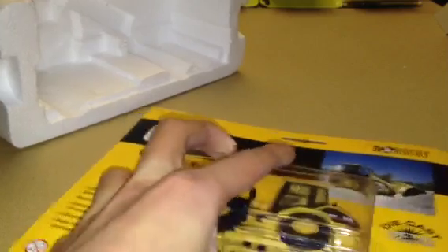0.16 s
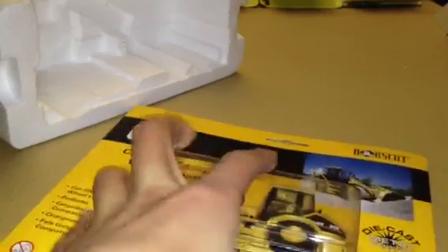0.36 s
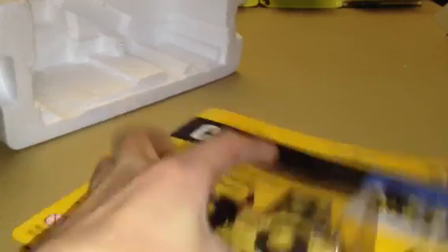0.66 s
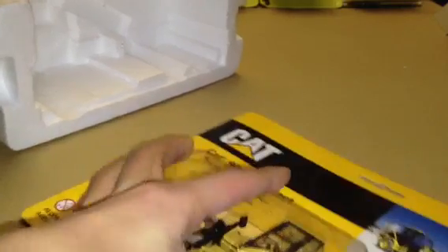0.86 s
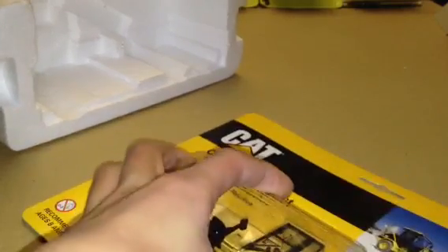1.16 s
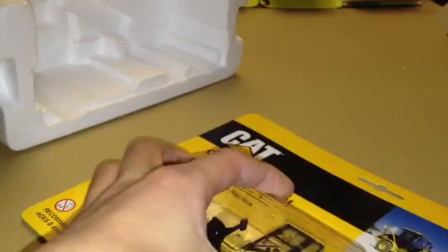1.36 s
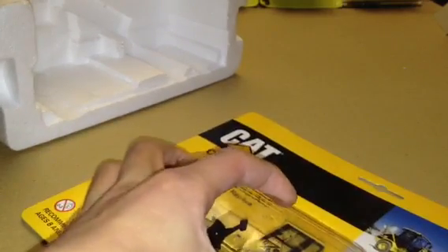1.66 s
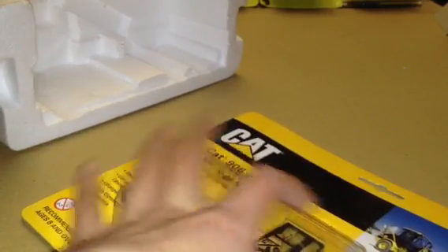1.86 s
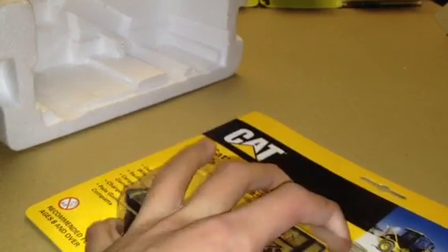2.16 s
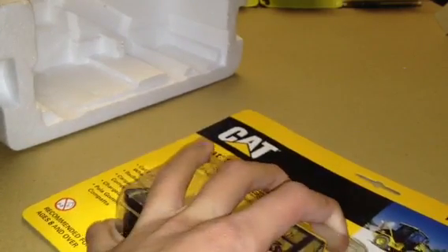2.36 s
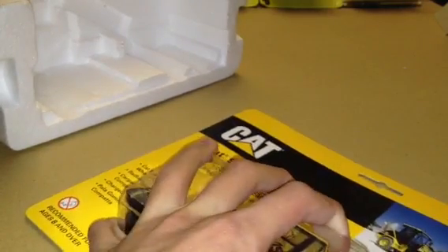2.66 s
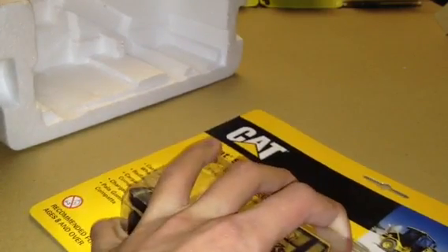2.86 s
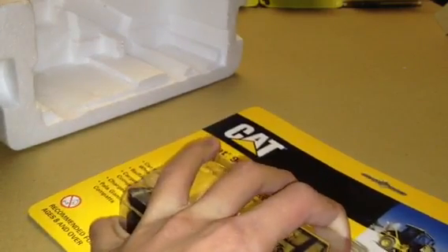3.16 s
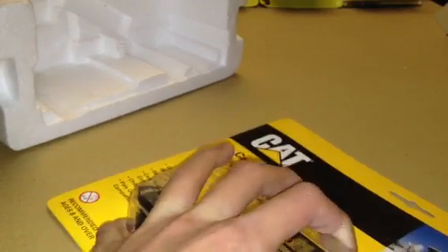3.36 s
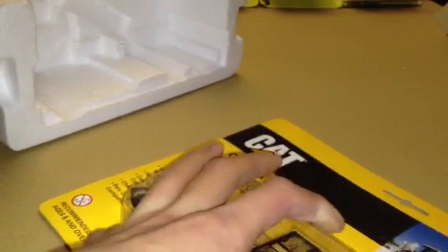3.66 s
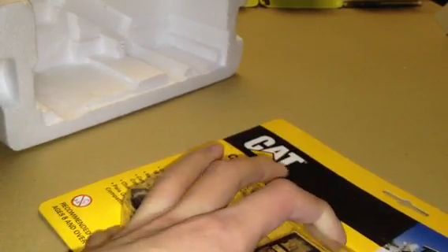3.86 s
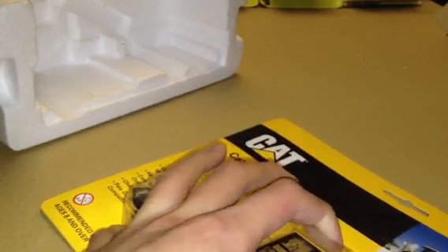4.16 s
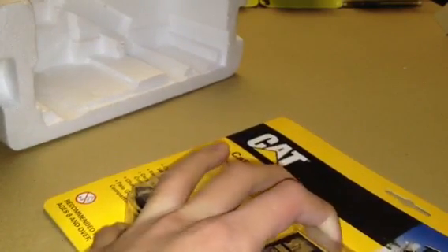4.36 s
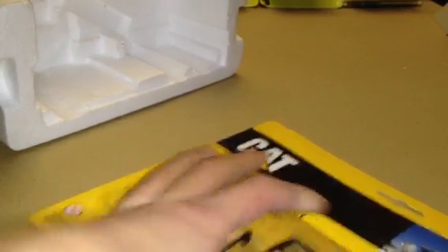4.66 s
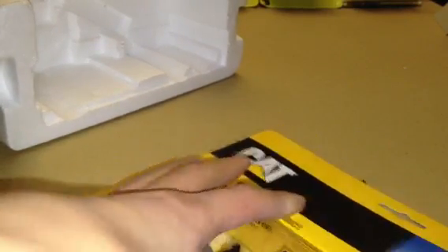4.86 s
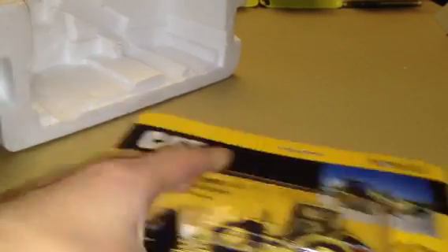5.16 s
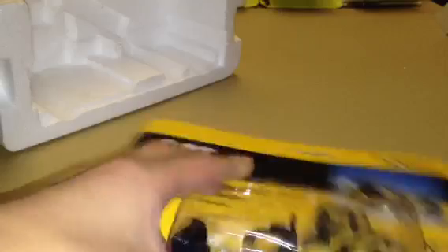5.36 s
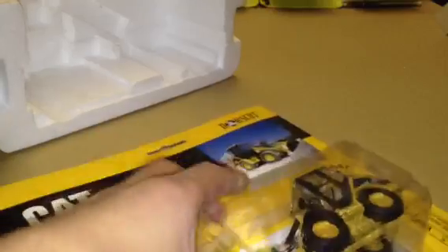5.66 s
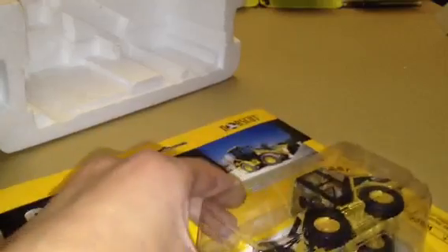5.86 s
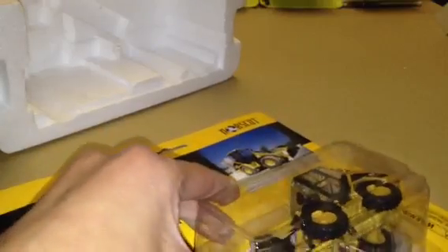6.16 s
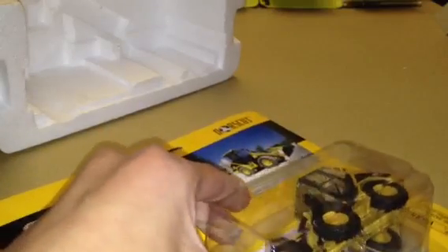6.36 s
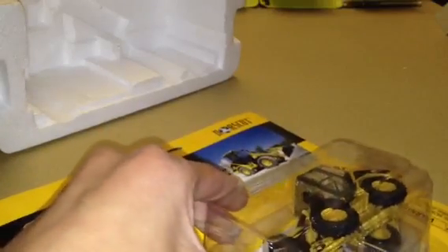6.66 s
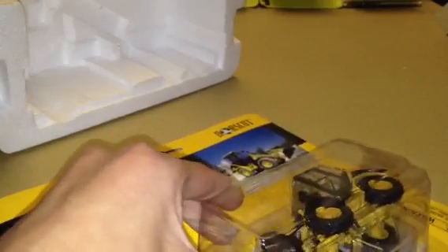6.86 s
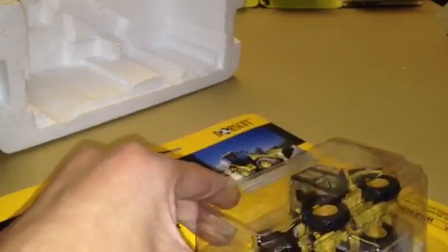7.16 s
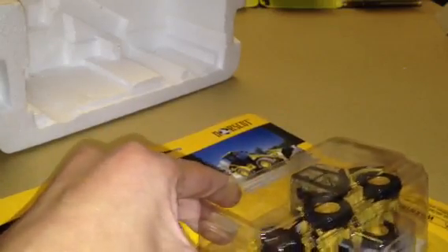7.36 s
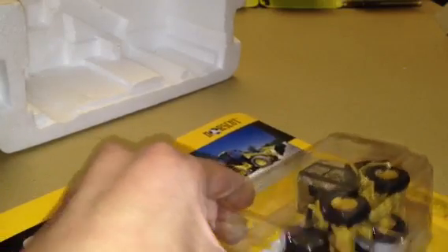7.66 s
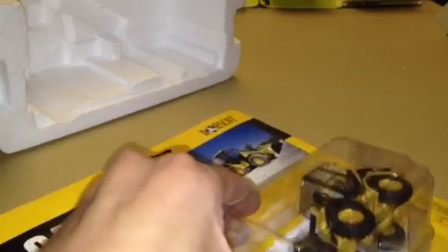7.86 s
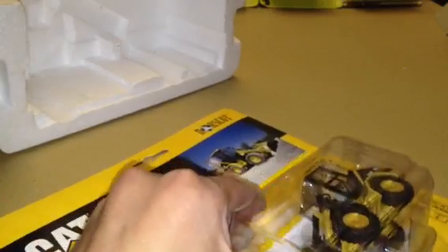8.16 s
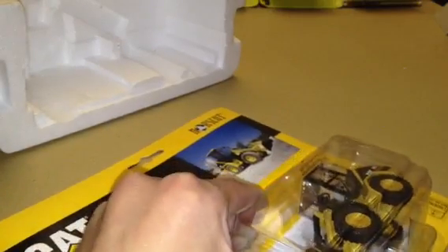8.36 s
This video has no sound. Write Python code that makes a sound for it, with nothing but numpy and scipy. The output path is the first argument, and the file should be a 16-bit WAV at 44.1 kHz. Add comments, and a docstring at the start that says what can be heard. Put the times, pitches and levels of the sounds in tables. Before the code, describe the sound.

Close recording of plastic packaging being pushed and flexed on a table indoors. Uneven strokes of friction hiss, brittle crackles, tearing ticks and faint low card groans fill the first half. A dull thud and smooth scraping mark a shift of the pack midway, followed by a cluster of pops. Later it is sparser and quieter, with small taps, a late sharp crack, a short room tail and faint hiss.

```python
"""Blister pack worked off its card

Hands work a stiff plastic blister off its cardboard backing on a table, close to the microphone in a small room.
The thin shell buckles in sharp snaps, noise bursts through shell resonances, that knock the card lower and longer.
Glue and fibres rasp in streams of ticks and part with high pings; fingers and card slide as patchy friction noise,
with crinkles, weaker snaps and taps, dull table bumps, low gliding groans and narrow singing bands.
The room adds early echoes and a short diffuse tail over a faint steady hiss.
"""
import sys
import numpy as np
from scipy import signal
from scipy.fft import rfft, irfft, next_fast_len
from scipy.io import wavfile
from scipy.ndimage import uniform_filter1d, map_coordinates

SR = 44100
rng = np.random.default_rng(int(sys.argv[2]) if len(sys.argv) > 2 else 0)


def persist_wave(psi):
    """Save psi, clipped to +-1, as 16-bit WAV."""
    counts = np.round(np.clip(psi, -1, 1) * 32767).astype(np.int16)
    wavfile.write(sys.argv[1], SR, np.atleast_2d(counts).T)


N = 374850

# Levels in the event tables are before the trims set in the function that plays them.
# The hand pushes the pack along. Each row: start in seconds, fastest moment in seconds, end in seconds,
# friction hiss in dB, card body in dB re the hiss.
STROKES = [(0, 0.196, 0.25, -49, -1), (0.264, 0.31, 0.37, -50.5, -4.5), (0.451, 0.49, 0.78, -52.5, -4),
           (0.575, 0.623, 0.8, -46.5, -2.5), (0.767, 0.85, 1.01, -57, -4), (1.155, 1.203, 1.36, -51, -3.5),
           (1.78, 1.88, 1.93, -50, -0.5), (1.939, 1.962, 2.11, -58, 0.5), (2.324, 2.36, 2.56, -56.5, -1),
           (2.55, 2.568, 2.65, -50.5, -3), (2.667, 2.782, 2.87, -46.5, -6.5),
           (3.117, 3.284, 3.39, -49.5, 0), (3.509, 3.553, 3.59, -50.5, -6.5), (3.69, 3.733, 3.74, -59, -9),
           (4.016, 4.08, 4.1, -49, -6), (4.15, 4.267, 4.5, -60.5, 1), (4.299, 4.35, 4.39, -44, -12),
           (4.46, 4.48, 4.6, -58, -12), (4.601, 4.703, 4.93, -50, -3.5), (4.89, 4.939, 5.2, -46, -1),
           (4.96, 5.08, 5.28, -46.5, -4.5), (5.196, 5.257, 5.68, -50, -1), (5.47, 5.51, 5.7, -46.5, -4.5),
           (5.758, 5.825, 6.2, -57.5, 0.5), (6.007, 6.24, 6.55, -59.5, -8),
           (6.392, 6.522, 6.65, -56.5, -2.5), (6.674, 6.818, 6.9, -76.5, 6), (7.349, 7.388, 7.7, -60.5, -2),
           (7.422, 7.486, 7.55, -51.5, 4), (7.593, 7.654, 7.76, -55, -5.5), (7.87, 7.904, 7.94, -57, 6.5),
           (7.96, 8.014, 8.9, -61.5, -6), (8.13, 8.312, 8.46, -52.5, 3), (8.4, 8.503, 8.6, -55, 5.5)]
# The pack glides flat on the table with less crinkling. Each row: start in seconds, end in seconds.
GLIDES = [(4.68, 5.2), (5.42, 5.64)]
# Quieter spans: no grip hiss and no random taps, but listed events still sound.
# Each row: start in seconds, end in seconds.
QUIETER_SPANS = [(2.17, 2.32), (3.02, 3.1), (3.76, 3.9), (6.61, 7.35), (7.79, 7.87)]
# Short tears and scrapes. Each row: start in seconds, swell point in seconds, nominal end in seconds,
# level in dB, treble in dB re the middle, squeak in Hz, tick share 0-1 (capped when played).
# The points may be out of order, and short rows play 512 samples.
RASPS = [(.04, 0.172, 0.22, -52.5, -1, 2600, 0.76), (0.454, 0.494, 0.56, -48.5, 5, 1390, 0),
         (0.681, .695, 0.72, -51, -4, 3300, .7), (.926, 0.94, 0.97, -38, -3, 7340, 0.6),
         (0.993, 0.991, 1.03, -33.5, -6.5, 2030, 0.5), (1.193, 1.225, 1.28, -37.5, -9, 1730, 0.53),
         (1.232, 1.27, 1.299, -37.5, 0, 3160, 0.74), (2.431, 2.435, 2.47, -40, -9, 3420, 0.46),
         (2.726, 2.736, 2.85, -46.5, 7, 3860, 0.5), (3.228, 3.248, 3.27, -40, -11, 1620, 0.7),
         (4.035, 4.072, 4.05, -45, -4, 4840, 0.8), (4.308, 4.324, 4.31, -39, -3, 1450, .55),
         (5.228, 5.289, 5.305, -32.5, -6, 5170, 0.76), (5.492, 5.501, 5.51, -41, 8, 5100, 0.2),
         (6.955, 6.966, 7.01, -47.5, -12.5, 1510, 0.38), (7.15, 7.159, 7.1, -44, 0, 1100, 0.25),
         (7.462, 7.49, 7.51, -42, -2.5, 1010, 0.56), (7.876, 7.883, 7.89, -43, 1, 4700, 1)]
# Threads of glue part with a tiny high ping. Each row: start in seconds, level in dB over 10 ms, centre in Hz.
PINGS = [(.172, -46, 11000), (1.948, -50, 8850), (2.593, -41, 10000), (2.799, -42, 10000),
         (3.364, -53, 7000), (3.942, -44, 7500), (3.961, -46.5, 8260), (3.996, -52, 8800),
         (4.017, -50, 8850), (4.451, -43, 6000)]
# The shell buckles. Each row: start in seconds, crack in dB over 10 ms, card knock in dB re the crack,
# treble in dB re the crack, card resonance in Hz, panel resonance in Hz, panel ring in dB re the whole shell,
# slip length in ms before scaling.
SNAPS = [(0.2184, -49.5, 6.5, 0.5, 931, 1580, 0, 3.6), (0.2708, -46, 5.5, -4.5, 282, 1670, -7, 5),
         (0.37, -47.5, 6.5, -8, 640, 3280, -2, 4), (0.6142, -31, 1, -6, 920, 2100, -1, 4.3),
         (.983, -39, 2.5, -8, 710, 3070, 10, 2.4), (.99, -31, .5, -9, 710, 2120, 0.5, 2.5),
         (1.1758, -39.5, -9, -2.5, 685, 1820, -2, 2.2), (1.2112, -40.5, 1, 7, 940, 2500, 5, 1.4),
         (1.4881, -37.5, -3.5, -2, 700, 1470, -1, 2.9), (1.5984, -35, 1, -10.5, 536, 3230, -8, 1.7),
         (1.8023, -42.5, 4.5, -6.5, 630, 1620, 1, 1.3), (1.9692, -40.5, -1, -4, 690, 1460, -0.5, 6),
         (2.0634, -43.5, 3.5, 3.5, 620, 1420, -9, 3.3), (2.5586, -36.5, 3.5, -15.5, 485, 3100, 0.5, 1.9),
         (2.5814, -43, 0.5, 8.5, 1050, 2840, -9, 1.6), (2.779, -38, 2.5, -3, 497, 1670, -4, 6.1),
         (2.8199, -44.5, 0, 5, 890, 4720, 0, 0.48), (2.8771, -37.5, -5.5, 4.5, 890, 4900, -1, 0.94),
         (2.963, -20, -14, -9, 500, 3290, -7, .9), (3.1478, -29, -7.5, -3, 470, 1560, -2, 0.91),
         (3.2215, -45, 6, -17.5, 684, 1990, 1, 1.8), (3.242, -22.5, -10.5, 5, 1090, 1650, 1.5, 2.16),
         (3.2608, -35, -8.5, -13, 590, 1833, -3, 3.5), (3.3002, -45.5, 9, -16, 510, 3810, -5, 2.6),
         (3.902, -49, -12.5, -15, 536, 2540, 8, 1.1), (4.0714, -41.5, -3.5, -2.5, 545, 4770, -13, 4.9),
         (4.325, -40, -3, -7, 620, 2730, -1, 4), (4.3578, -39, -14, -3.5, 500, 4620, -2, 5.4),
         (4.4511, -41, -14, -5, 550, 4760, -3, 5.2), (4.9106, -36.5, -0.5, 4, 940, 1770, -3, 1.25),
         (5.073, -34.5, 2, -0.5, 258, 1390, -2, 4.1), (5.235, -33, -3, 3.5, 904.8, 4440, 3, 3.03),
         (5.249, -36, 1.5, -12, 690, 3130, -2, 1.7), (5.2664, -26.5, -6, 0, 634, 2840, -7, 1.2),
         (5.365, -46, 7, -8, 613, 1440, -9, 2.3), (5.397, -31, -6, -7, 910, 4470, -4, 1.2),
         (5.657, -44, -24, 5, 480.5, 4180, 8, 2.16), (5.6789, -43, -19, 1.5, 880, 4710, 5, 1.8),
         (5.7114, -39, -20, 1, 460, 3467, 1, 1.5), (5.7937, -40, 3.5, 8.5, 940, 4550, -3, 2.1),
         (6.191, -42, .5, 1.5, 479, 4640, -1, 1.9), (6.3531, -31.5, -7, 1.5, 1240, 4500, -3, 3.6),
         (6.3935, -43, 8, -4, 819, 1400, -13, 2.3), (6.956, -46, 0.5, 1.5, 750, 2640, -11.5, 3.5),
         (7.1916, -45.5, 2, 2, 710, 4790, 1, 4.7), (7.2518, -44, 6.5, -1.5, 1060, 1210, -5, 2.8),
         (7.605, -46.5, 2.5, -0.5, 980, 2700, -4, 1), (7.6915, -51, 9, 8, 923, 4700, 2, 1.1),
         (7.8663, -24.5, -7.5, 0.5, 710.5, 1890, -4.5, 1.6), (7.869, -24.5, -17, -2, 720, 4230, 3, 1.7),
         (8.0298, -43, 10.5, -3.5, 696, 3880, 2.5, 1.9), (8.2631, -44.5, 4.5, -1, 920, 4030, -8, 1.9),
         (8.272, -33.5, -3.5, -7.5, 891.5, 3930, 0.5, 2.2), (8.4822, -45.5, 2.5, -6, 940, 3370, -2, 1.7)]
# The pack bumps the table. Each row: start in seconds, level in dB over 10 ms, resonance in Hz.
THUMPS = [(.272, -42.5, 196), (.617, -33, 500), (.73, -45, 625), (.762, -44, 615), (.992, -34.5, 316),
          (1.971, -44.5, 177), (2.065, -35, 657), (3.242, -36, 320), (3.377, -50, 347), (3.495, -55.5, 325),
          (5.074, -32, 420), (5.075, -27.5, 263), (5.08, -36.5, 218), (5.104, -44, 312),
          (5.169, -45.5, 330), (5.516, -48, 173), (6.394, -39.5, 364), (6.479, -48, 800), (8.031, -41, 358)]
# The bent card groans. Each row: start in seconds, end in seconds, start pitch in Hz, end pitch in Hz, level in dB.
FLEXES = [(0.619, 0.79, 239.4, 181, -57), (2.615, 2.715, 363, 396, -58.5), (2.725, 2.875, 326, 334, -59),
          (2.873, 2.935, 433, 385, -61.5), (3.097, 3.145, 377, 318, -56), (3.176, 3.29, 605, 558, -54),
          (3.295, 3.395, 548, 332, -56), (3.311, 3.375, 245, 165, -60.5)]
# Weaker snaps, ticks and light taps. Each row: start in seconds, level in dB over 10 ms, card knock in dB re that.
TAPS = [(0.841, -54.5, 5.5), (1.104, -45, -8.5), (1.299, -52, -7), (1.348, -51, -8), (1.467, -53.5, 1),
        (1.532, -48.5, -6), (1.558, -43.5, -5.5), (1.836, -46.5, -1), (1.845, -45, -10), (2.144, -65, 17.5),
        (2.324, -56.5, 7.5), (2.355, -51.5, 6), (2.491, -43.5, -5), (2.869, -53.5, 4), (3.106, -57.5, 12),
        (3.234, -35, -6), (3.272, -39.5, -4), (3.461, -73, -2), (3.739, -57.5, -0.5), (3.821, -62, 0.5),
        (4.498, -55.5, 8.5), (4.638, -47.5, 1.5), (4.886, -48.5, 4), (5.201, -48.5, -3),
        (5.594, -47.5, -15), (5.772, -45, -0.5), (5.848, -51.5, -10), (5.908, -54, 6), (6.046, -52, 4),
        (6.102, -52.5, 7), (6.227, -51.5, 2.5), (6.502, -50.5, -1), (6.98, -50, 3.5), (7.061, -58.5, 11),
        (7.164, -48.5, -1.5), (7.241, -44.5, -4), (7.737, -54, 2.5), (7.783, -48, 1.5), (7.818, -56.5, 4),
        (7.939, -46.5, -5), (7.966, -45, -4), (8.132, -50.5, 0), (8.171, -51.5, 4.5), (8.196, -57, 8),
        (8.243, -57, 8), (8.221, -53, 4), (8.304, -48.5, 2.5), (8.331, -50, 4.5), (8.411, -50, 4)]
# A sliding edge sings in one band. Each row: start in seconds, end in seconds, centre in Hz, width in Hz, level in dB.
SINGS = [(4.648, 4.89, 1340, 900, -62), (4.789, 5.2, 3890, 240, -66), (7.157, 7.239, 770, 200, -56)]
# Resonances of the plastic shell. Each row: centre in Hz, width in Hz, level in dB.
SHELL = [(1537, 220, 4), (1925, 140, 1), (2700, 330, 0.5), (3930, 540, 0.5), (4620, 450, 0),
         (6220, 300, -3.5), (8550, 280, -8.5), (9700, 160, -16), (11500, 580, -9)]
# Spectrum of the shell's crack. Each row: frequency in Hz, relative level in dB per Hz.
CRACK = [(600, -36.5), (1150, -19), (1500, -4.5), (2000, -2.5), (2400, -3), (3300, 1), (4200, -4.5),
         (6000, -3), (7500, -4.5), (9500, -28)]
# Spectrum of the treble, for sizzle and sheen. Each row: frequency in Hz, relative level in dB per Hz.
TREBLE = [(4500, -34.5), (6500, 1), (8000, 4), (10500, 3.5), (13000, 3), (15000, 1)]
# Spectrum of a knock on the card. Each row: frequency in Hz, relative level in dB per Hz.
KNOCK = [(30, -34.5), (80, -30), (150, -11), (280, -5), (520, 2.5), (700, 2.5), (1000, 1.5), (1300, -4.5),
         (2000, -16), (4000, -55.5)]
# Spectrum of friction on the shell. Each row: frequency in Hz, relative level in dB per Hz.
FRICTION = [(700, -22.5), (1150, -8.5), (1600, 1.5), (2400, -1.5), (4000, -3.5), (6000, -6.5), (9000, -8.5),
            (15000, -10.5)]
# Spectrum of the rubbed card body. Each row: frequency in Hz, relative level in dB per Hz.
CARD = [(30, -32.5), (70, -32.5), (110, -9.5), (160, -3), (330, -0.5), (480, 0.5), (660, 5), (800, -4.5),
        (950, 3), (1300, -11), (2200, -42)]
# Spectrum of the steady hiss in the room. Each row: frequency in Hz, relative level in dB per Hz.
ROOM_TONE = [(25, -18.5), (60, -9), (150, 8), (280, 7.5), (500, 3.5), (1200, -3), (4000, -5), (15000, -10)]
# Decay of the room's tail. Each row: frequency in Hz, time to fall 60 dB in seconds.
ROOM = [(150, 0.13), (500, 0.21), (2000, 0.18), (6000, 0.17), (15000, 0.19)]

STROKE_EDGE_DB, STROKE_RAMP_S = -9.5, 0.029  # edge level re the peak; time to get going or stop
SETTLE_DB, SETTLE_CARD_DB, SETTLE_T60 = -58.5, 0.5, .28  # pack settling after a snap: hiss, card re hiss, s
RESTING_DB, RESTING_CARD_DB, RESTING_WANDER_DB = -68, -1.5, 2  # gripping hand: hiss, card re hiss, unrest
STRAY_DB, STRAY_SPREAD_DB, STRAY_KNOCK_DB = -60.5, 3, 3.5  # random taps: level, scatter, knock re level
GLIDE_GRAIN = .25  # share of the grain that remains in a glide
TOP_HZ = 15400


def amp(db):
    """Decibels to gain."""
    return 10 ** (np.asarray(db) / 20)


def unit(x):
    """Scaled to rms 1."""
    return x / np.sqrt(np.mean(x ** 2) + 1e-20)


def burst(x):
    """Scaled so that its energy equals rms 1 over 10 ms."""
    return x / np.sqrt(np.sum(x ** 2) / (SR / 100) + 1e-20)


def along(points, hz):
    """(Hz, value) points read on a log axis."""
    f, v = np.transpose(points)
    return np.interp(np.log(hz + 1), np.log(f), v)


def wobble(rate):
    """A smooth random curve, rate knots a second."""
    knots = rng.standard_normal(int(N * rate / SR) + 4)
    return map_coordinates(knots, [np.arange(N) * rate / SR])


def coloured(x, gain):
    """x through the causal minimum-phase filter whose magnitude is gain(Hz)."""
    m = 2 * next_fast_len(len(x) // 2 + 1024)
    cepstrum = irfft(np.log(np.maximum(gain(np.fft.rfftfreq(m, 1 / SR)), 1e-6)))
    # folding the cepstrum forward in time makes the filter causal
    cepstrum[1:m // 2] *= 2
    cepstrum[m // 2 + 1:] = 0
    return irfft(rfft(x, m) * np.exp(rfft(cepstrum)), m)[:len(x)]


def bell(hz, centre, width):
    """Magnitude of one resonance."""
    return 1 / np.sqrt(1 + (2 * (hz - centre) / width) ** 2)


def spectrum_gain(spectrum):
    """A spectrum table as a gain over Hz."""
    return lambda hz: amp(along(spectrum, hz))


def plastic(spectrum, bend=1, between_db=-8):
    """A spectrum ridged by the shell's resonances; bending shifts them all."""
    ridges = lambda hz: sum((amp(db) * bell(hz, bend * c, w)) ** 2 for c, w, db in SHELL)
    return lambda hz: amp(along(spectrum, hz)) * np.sqrt(amp(between_db) ** 2 + ridges(hz))


def ticks(size, rate, spread_db):
    """Random tiny slips of uneven strength, on average rate a second, rms 1."""
    strength = amp(spread_db * np.clip(rng.standard_normal(size), -2, 2))
    signed = strength * rng.choice([-1, 1], size)
    return unit(signed * (rng.random(size) < rate / SR))


def grainy(size, share, rate, spread_db):
    """Smooth friction noise mixed with a power share of ticks."""
    share = np.clip(share, 0, 1)
    smooth = np.sqrt(1 - share) * rng.standard_normal(size)
    return smooth + np.sqrt(share) * ticks(size, rate, spread_db)


def patchy(x, depth_db):
    """The contact point wanders, so the colour changes in patches of time and frequency."""
    z = signal.stft(x, nperseg=256)[2]
    field = uniform_filter1d(rng.standard_normal(z.shape), size=5, axis=0)
    field = uniform_filter1d(field, size=8, axis=1)
    return signal.istft(z * amp(depth_db * unit(field)), nperseg=256)[1][:len(x)]


def add(track, s, sound):
    """Lay a sound into the track at s seconds."""
    start = max(round(s * SR), 0)
    track[start:start + len(sound)] += sound[:max(N - start, 0)]


def outside_quieter_spans(s):
    """True at the times when grip hiss and random taps may sound."""
    return np.all([(s < start) | (s > end) for start, end in QUIETER_SPANS], axis=0)


def effort():
    """Strength of friction hiss and card body: each stroke swells and eases, each snap lets the pack settle."""
    t = np.arange(N) / SR
    gripping = uniform_filter1d(outside_quieter_spans(t).astype(float), size=1024)
    resting = gripping * amp(RESTING_DB + RESTING_WANDER_DB * wobble(7))
    snap_s = np.sort([row[0] for row in SNAPS])
    since_snap = t - np.r_[-np.inf, snap_s][np.searchsorted(snap_s, t)]
    settling = amp(SETTLE_DB - 60 * since_snap / SETTLE_T60)
    hiss_power = resting ** 2 + settling ** 2
    body_power = (amp(RESTING_CARD_DB) * resting) ** 2 + (amp(SETTLE_CARD_DB) * settling) ** 2
    for start, fastest, end, db, card_db in STROKES:
        s = t[(t > start) & (t < end)]
        moving = np.clip(np.minimum(s - start, end - s) / STROKE_RAMP_S, 0, 1)
        swell_db = np.interp(s, [start, fastest, end], [STROKE_EDGE_DB, 0, STROKE_EDGE_DB])
        stroke = moving * amp(db + swell_db)
        add(hiss_power, start, stroke ** 2)
        add(body_power, start, (amp(card_db) * stroke) ** 2)
    return np.sqrt(hiss_power), np.sqrt(body_power)


def sliding(hiss_db=-2.5, sheen_db=-5, body_db=-1, crinkle_db=-6.0, crinkle_knock_db=-5, crinkle_t60=0.012):
    """Skin and card slide under uneven pressure; the flexing shell sheds crinkles in step with the effort."""
    hiss, body = effort()  # gains per sample
    speed = np.clip(hiss / amp(-47.5), 0, 1) ** 1.4  # faster strokes are brighter
    now = np.arange(N) / SR
    gliding = np.any([(now > start) & (now < end) for start, end in GLIDES], axis=0)
    grain = np.where(gliding, GLIDE_GRAIN, 1)
    pressure = amp(np.sqrt(grain) * (1.4 * wobble(18) + 1.3 * wobble(70)))
    rub = pressure * patchy(grainy(N, share=.5 * grain, rate=650, spread_db=4), depth_db=2.2)

    t = np.arange(1024) / SR
    crinkle_decay = amp(-60 * t / crinkle_t60)
    crinkle_level = signal.fftconvolve(np.abs(ticks(N, rate=50, spread_db=4)), crinkle_decay)[:N]
    crinkles = np.sqrt(grain) * patchy(crinkle_level * rng.standard_normal(N), depth_db=5.5)

    shell = lambda x: unit(coloured(x, plastic(FRICTION, between_db=1.0)))
    card = lambda x: unit(coloured(x, spectrum_gain(CARD)))
    glide = np.sqrt(pressure) * rng.standard_normal(N)  # the glossy card on the table top hisses smoothly
    sheen = speed * unit(coloured(glide, spectrum_gain(TREBLE)))
    friction = amp(hiss_db) * shell(rub) + amp(sheen_db) * sheen + amp(crinkle_db) * shell(crinkles)
    card_body = amp(body_db) * card(rub) + amp(crinkle_knock_db) * card(crinkles)
    return hiss * friction + body * card_body


def rasps(level_db=-1, card_db=-7, edge_db=-13, squeak_db=10, squeak_width_hz=520):
    """Fibres and glue let go in a stream of ticks that sets one patch of plastic squeaking."""
    out = np.zeros(N)
    for start, swell_s, end, db, treble, squeak_hz, share in RASPS:
        t = np.arange(max(round((end - start) * SR), 512)) / SR + start
        swell = amp(np.interp(t, [start, swell_s, end], [edge_db, 0, edge_db]))
        swell = swell * signal.windows.tukey(len(t), .1)
        fibres = patchy(grainy(len(t), min(share, .9), rate=300, spread_db=5), depth_db=2.5)
        squeak = lambda hz: 1 + amp(squeak_db) * bell(hz, squeak_hz, squeak_width_hz) ** 2
        panel = lambda hz: plastic(CRACK, between_db=0)(hz) * squeak(hz)
        sizzle = unit(coloured(fibres, plastic(TREBLE, between_db=4.5)))
        shell = unit(coloured(fibres, panel)) + amp(treble) * sizzle
        card = unit(coloured(fibres, spectrum_gain(KNOCK)))
        add(out, start, amp(db + level_db) * swell * (shell + amp(card_db) * card))
    return out


def pings(t60=0.013, width_hz=5500):
    """A thread of glue lets go and flicks a small stiff spot of the shell."""
    out, t = np.zeros(N), np.arange(1024) / SR
    for s, db, centre_hz in PINGS:
        flick = amp(-60 * t / t60) * rng.standard_normal(len(t))
        add(out, s, amp(db) * burst(coloured(flick, lambda hz: bell(hz, centre_hz, width_hz) ** 2)))
    return out


def snaps(panel_width_hz, between_db, knock_db=0.5, bend_spread=0.033, slip_scale=0.91, knock_t60=0.036,
          card_ring_db=5, card_width_hz=190, stutter_db=-17, stutter_t60=0.038):
    """A crease jumps in a quick run of slips: the shell cracks at once, the card behind rings lower and longer."""
    out, t = np.zeros(N), np.arange(4096) / SR
    for s, db, knock, treble, card_hz, panel_hz, panel_db, slip_ms in SNAPS:
        slip = slip_scale * max(slip_ms, .4) / 1000  # s
        bend = np.exp(bend_spread * rng.standard_normal())
        run = np.exp(-t / (2 * slip)) * (1 - np.exp(-t / (0.12 * slip)))
        jumps = lambda: burst(run * grainy(len(t), share=0.66, rate=3000, spread_db=2.5))
        # the crease settles in a few weaker jumps
        stutter = amp(-60 * t / stutter_t60) * grainy(len(t), share=0.62, rate=240, spread_db=3.5)
        slips = jumps() + amp(stutter_db) * burst(stutter)

        # the panel that buckles adds its own broad resonance to those of the whole shell
        panel = burst(coloured(jumps(), lambda hz: bell(hz, panel_hz, panel_width_hz) ** 2))
        shell = burst(coloured(slips, plastic(CRACK, bend, between_db)))
        crack = burst(shell + amp(panel_db) * panel)
        sizzle = burst(coloured(slips, plastic(TREBLE, bend, between_db)))

        push = amp(-60 * t / knock_t60) * (1 - np.exp(-t / (0.49 * slip))) * rng.standard_normal(len(t))
        # a smaller, higher patch of card has less bass
        radiation = lambda hz: 0.55 + hz ** 4 / (hz ** 4 + (0.39 * card_hz) ** 4)
        ring = lambda hz: 1 + amp(card_ring_db) * bell(hz, card_hz, card_width_hz) ** 2
        card = burst(coloured(push, lambda hz: amp(along(KNOCK, hz)) * radiation(hz) * ring(hz)))
        add(out, s, amp(db) * (crack + amp(treble) * sizzle + amp(knock + knock_db) * card))
    return out


def thumps(level_db=-1, t60=0.059, width=.5, skirt_db=-24):
    """A soft, dull blow rings one broad low resonance of card and table top."""
    out, t = np.zeros(N), np.arange(4096) / SR
    radiation = lambda hz: hz ** 4 / (hz ** 4 + 130 ** 4)  # a small sheet radiates little deep bass
    for s, db, centre_hz in THUMPS:
        push = (1 - np.exp(-t / 0.00065)) * amp(-60 * t / t60) * rng.standard_normal(len(t))
        resonance = lambda hz: radiation(hz) * bell(hz, centre_hz, width * centre_hz) ** 2
        body = lambda hz: resonance(hz) + amp(skirt_db) * amp(along(KNOCK, hz))
        add(out, s, amp(db + level_db) * burst(coloured(push, body)))
    return out


def flexes(level_db=-1, octave_db=-12):
    """The card sticks and slips evenly as it bends: a low tone with a weak octave that glides with the bend."""
    out, drift, flutter = np.zeros(N), wobble(130), amp(2.5 * wobble(80))
    for start, end, from_hz, to_hz, db in FLEXES:
        size = round((end - start) * SR)
        local_drift = np.roll(drift, -round(start * SR))[:size]
        hz = np.linspace(from_hz, to_hz, size) * (1 + .024 * local_drift)
        phase = 2 * np.pi * np.cumsum(hz) / SR
        tone = np.sin(phase) + amp(octave_db) * np.sin(2 * phase)
        add(out, start, amp(db + level_db) * unit(signal.windows.tukey(size) * tone))
    return out * flutter


def stray_taps(count=16):
    """Up to count faint taps at random moments outside the quieter spans, as rows like those of TAPS."""
    when, chance = rng.uniform(0, N / SR, count), rng.standard_normal((count, 2))
    return [(s, STRAY_DB + STRAY_SPREAD_DB * a, STRAY_KNOCK_DB + STRAY_SPREAD_DB * b)
            for s, (a, b) in zip(when, chance) if outside_quieter_spans(s)]


def taps(treble_db=-5, knock_db=-1, tick_t60=0.023, knock_t60=0.043, bend_spread=0.091):
    """A weaker snap, tick or light tap sounds the shell and nudges the card."""
    out, t = np.zeros(N), np.arange(2048) / SR
    for s, db, knock in TAPS + stray_taps():
        bend = np.exp(bend_spread * rng.standard_normal())
        touch = (1 - np.exp(-t / 0.001)) * grainy(len(t), share=0.6, rate=2500, spread_db=6)
        contact = touch * amp(-60 * t / tick_t60)
        shell = burst(coloured(contact, plastic(CRACK, bend)))
        sizzle = burst(coloured(contact, plastic(TREBLE, bend)))
        tick = burst(shell + amp(treble_db) * sizzle)
        nudge = touch * amp(-60 * t / knock_t60)
        card = burst(coloured(nudge, lambda hz: amp(along(KNOCK, hz / bend))))
        add(out, s, amp(db) * (tick + amp(knock + knock_db) * card))
    return out


def sings():
    """Steady rubbing keeps one resonance of the pack sounding."""
    out = np.zeros(N)
    for start, end, centre_hz, width_hz, db in SINGS:
        rub = rng.standard_normal(round((end - start) * SR))
        band = coloured(rub, lambda hz: bell(hz, centre_hz, width_hz) ** 2)
        add(out, start, amp(db) * unit(band * signal.windows.tukey(len(band))))
    return out


def room(x, early_db=-17, tail_db=-19, early_delay=0.01, early_t60=0.06):
    """Nearby things and walls answer after a few metres of travel, with a short diffuse tail."""
    hz, t, z = signal.stft(rng.standard_normal(SR // 2), SR, nperseg=256)
    tail = signal.istft(z * amp(-60 * t / along(ROOM, hz)[:, None]), SR, nperseg=256)[1]
    t = np.arange(len(tail)) / SR
    tail = tail * np.minimum(t / early_delay, 1)
    early = ticks(len(t), rate=2300, spread_db=3.0) * (t > early_delay) * amp(-60 * t / early_t60)
    answer = amp(early_db) * early / np.linalg.norm(early) + amp(tail_db) * tail / np.linalg.norm(tail)
    return signal.fftconvolve(x, answer)[:N]


def room_tone(floor_db=-69):
    """A faint steady hiss: noise shaped by one fixed spectrum."""
    return amp(floor_db) * unit(coloured(rng.standard_normal(N), spectrum_gain(ROOM_TONE)))


def scene():
    """The pack close to the microphone, the room's answer, and a faint steady hiss."""
    handling = sliding() + rasps() + pings() + thumps() + flexes() + taps() + sings()
    # the microphone faces one buckling panel; the walls hear all sides of the shell, so its resonances blur
    direct = handling + snaps(panel_width_hz=480, between_db=-8)
    outward = handling + snaps(panel_width_hz=2400, between_db=7)
    return (direct + room(outward) + room_tone())[None]


def record(dry):
    """The microphone's sound falls away very steeply above the band limit."""
    hz = np.fft.rfftfreq(2 * N, 1 / SR)
    return irfft(rfft(dry, 2 * N) / np.sqrt(1 + (hz / TOP_HZ) ** 200))[:, :N]


dry = scene()
out = record(dry)
persist_wave(out)
```